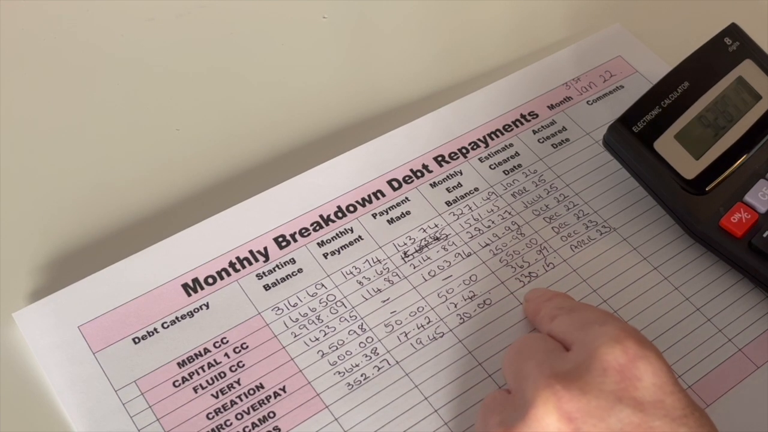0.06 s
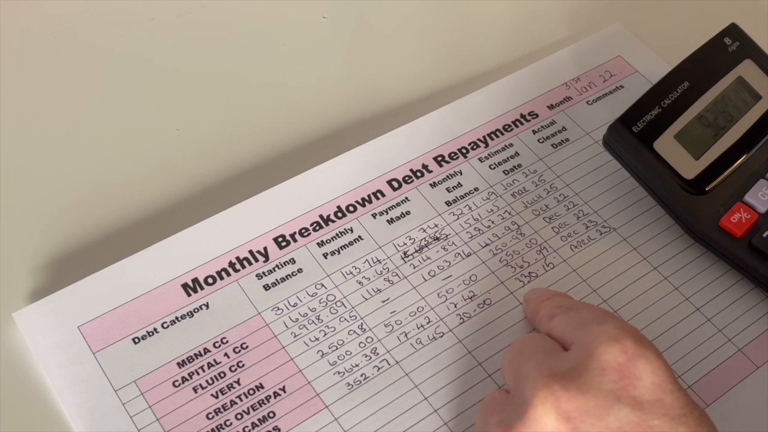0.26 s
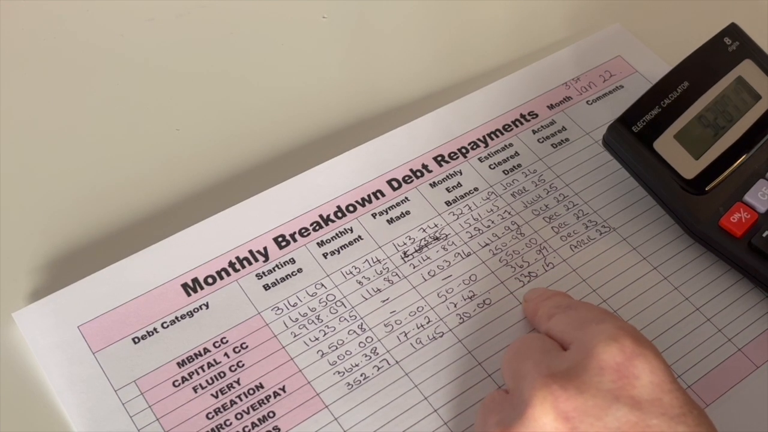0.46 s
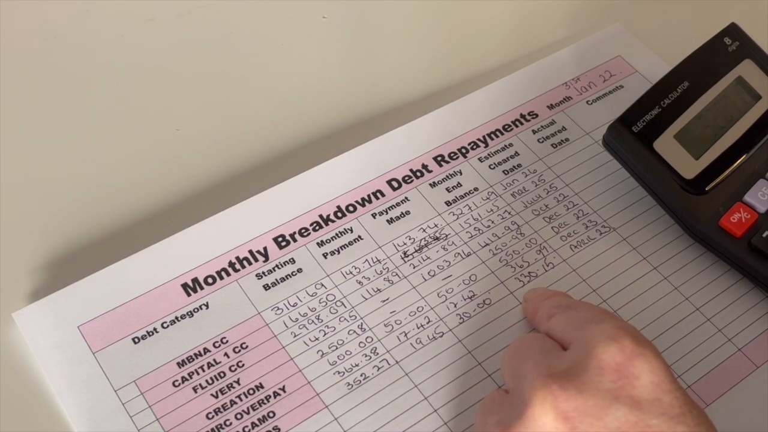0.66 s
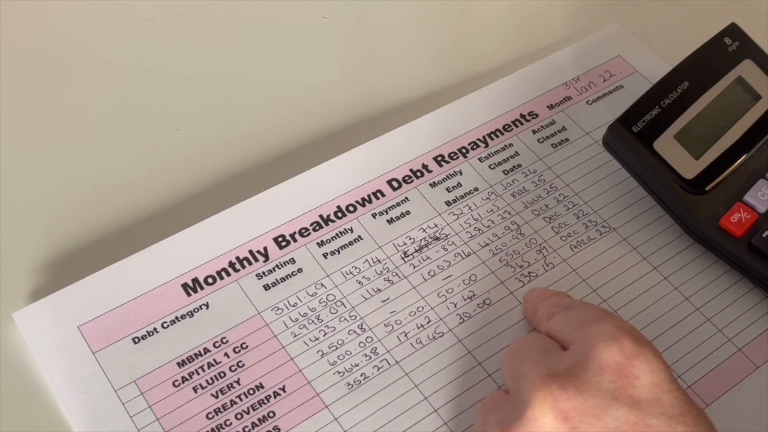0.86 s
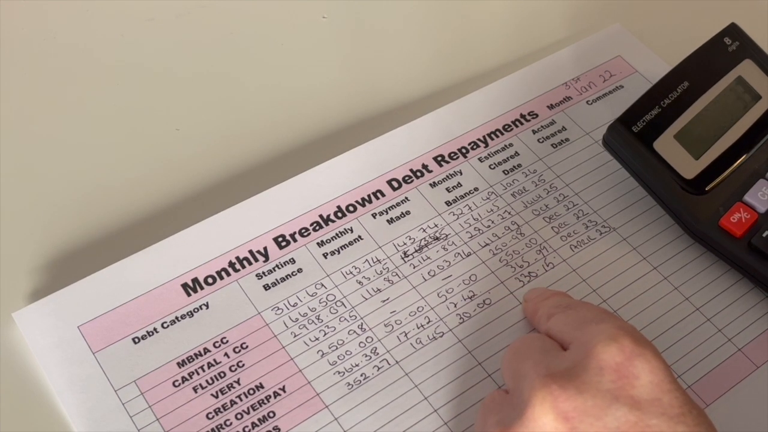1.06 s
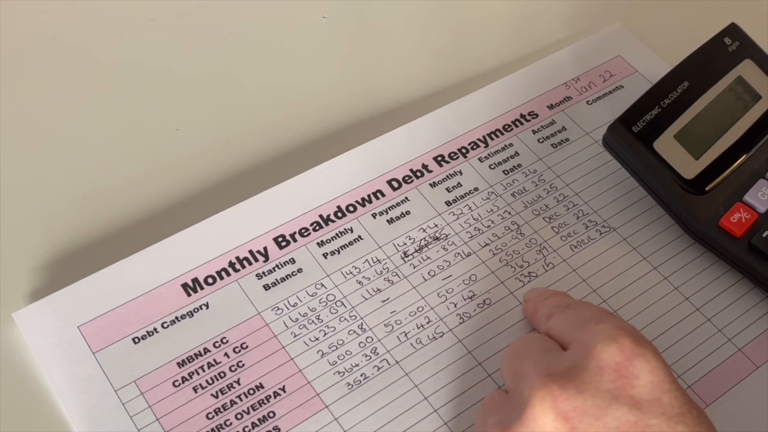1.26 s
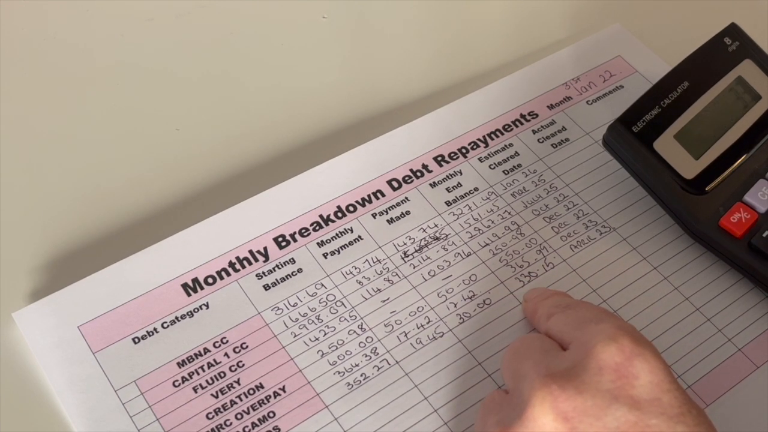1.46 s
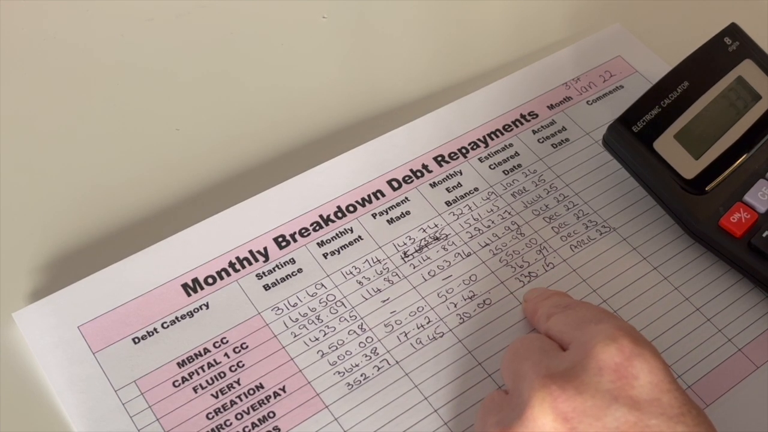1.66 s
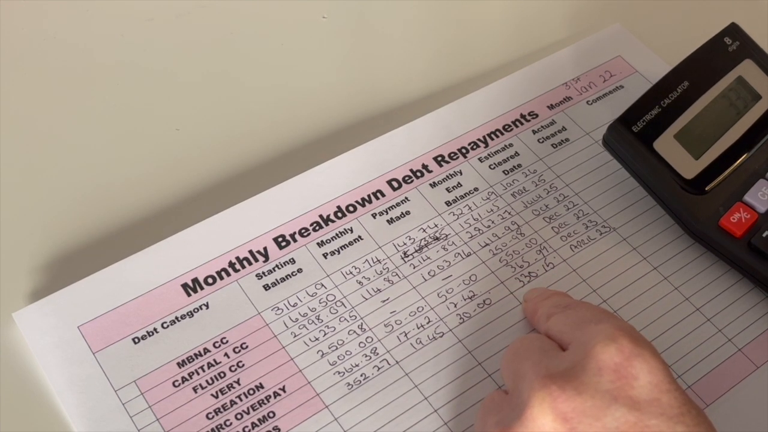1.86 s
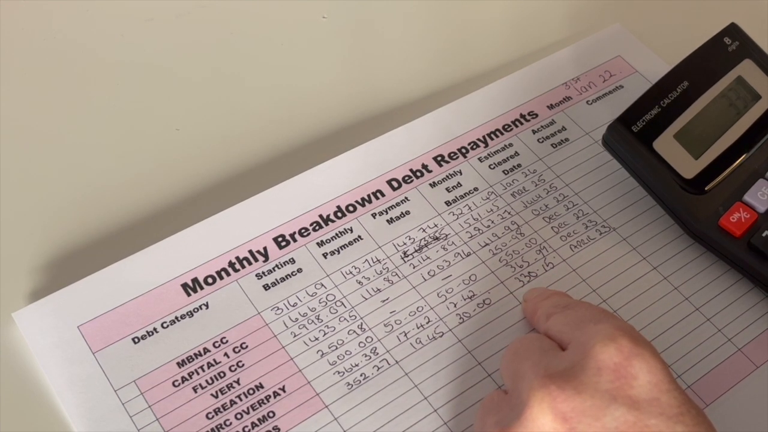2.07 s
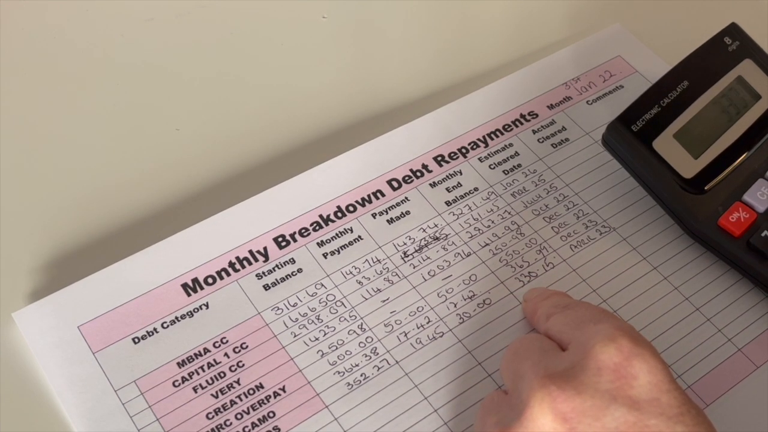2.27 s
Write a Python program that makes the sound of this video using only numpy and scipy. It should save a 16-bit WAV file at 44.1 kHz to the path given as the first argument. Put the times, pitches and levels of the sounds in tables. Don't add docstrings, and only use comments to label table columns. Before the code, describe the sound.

Desk calculator keys pressed one after another, plastic clicks with soft thumps on the desk

```python
import sys
import numpy as np
from scipy import signal
from scipy.fft import rfft, irfft
from scipy.io import wavfile
from scipy.ndimage import uniform_filter1d, map_coordinates

SR = 44100
rng = np.random.default_rng(int(sys.argv[2]) if len(sys.argv) > 2 else 0)


def to_wav(s):
    ch = np.atleast_2d(s).T
    pcm = np.round(np.clip(ch, -1, 1) * 32767)
    wavfile.write(sys.argv[1], SR, pcm.astype(np.int16))


def boost_factor(decibels):
    exponent = np.asarray(decibels, float) / 20
    return 10 ** exponent


N = 101782


def on_log(table, hz):
    table = np.array(table, float)
    return np.interp(np.log(np.maximum(hz, 1)), np.log(table[:, 0]), table[:, 1])


def colour(x, table, extra_db=0):
    hz = np.arange(x.shape[-1] // 2 + 1) * SR / x.shape[-1]
    y = irfft(rfft(x) * boost_factor(on_log(table, hz) + extra_db), x.shape[-1])
    return y / np.sqrt(np.mean(y ** 2))


def decay(t, t60):
    return np.exp(-np.log(1000) * t / t60)


def ring(hz, t60, t):
    return np.sin(2 * np.pi * hz * t) * decay(t, t60)


def add(out, s, x):
    i = int(s * SR)
    out[i:i + len(x)] += x[:len(out) - i]


def walk(rate):
    k = int(SR / rate)
    steps = np.repeat(rng.standard_normal(N // k + 1), k)
    return 1.3 * uniform_filter1d(uniform_filter1d(steps, k), k)[:N]


# (frequency [Hz], level [dB per Hz])
FLOOR_HUE = [(12, -50.5), (20, -42), (36, -3), (59, 1.5), (160, -17), (693, -32), (1420, -42), (5530, -51),
             (15000, -59.5)]


def floor():
    air = colour(rng.standard_normal((2, N)), FLOOR_HUE)
    rumble = signal.sosfilt(signal.butter(2, 600, fs=SR, output="sos"), air)
    fade_db = -6.5 * np.minimum(np.arange(N) / SR - 1.2, 0)
    throb = boost_factor(fade_db + 0.69 * walk(4.16))
    return boost_factor(-60) * (air + rumble * (throb - 1))


# (start [s], full [s], fading [s], end [s], level [dB])
SLIDES = [
    (.0, 0.138, 0.24, .27, -66.5),
    (1.896, 1.96, 2.07, 2.137, -66.5),
]
# (frequency [Hz], level [dB per Hz])
SLIDE_HUE = [(400, -32), (800, -6.5), (1500, -4.5), (2500, -2), (5000, -8), (7500, -14.5), (12000, -15.5),
             (15000, -20)]
# (start [s], full [s], fading [s], end [s], level [dB])
RUBS = [
    (-.1, -.05, 0.015, 0.028, -73.5),
    (.15, .27, 0.38, .45, -73),
]
# (frequency [Hz], level [dB per Hz])
RUB_HUE = [(900, -5.5), (1600, -10), (1750, 1.5), (2150, -2.5), (2500, -13.5), (4000, -20), (6000, -33)]


def slides():
    t = np.arange(N) / SR
    out = np.zeros(N)
    for rows, hue in ((SLIDES, SLIDE_HUE), (RUBS, RUB_HUE)):
        swell = sum(boost_factor(db) * np.interp(t, times, [0, 1, 1, 0]) for *times, db in rows)
        uneven = boost_factor(walk(30))
        out += swell * uneven * colour(rng.standard_normal(N), hue)
    return out


# (time [s], tick level [dB], case ring level [dB], brightness [dB per half octave])
CONTACTS = [(.5484, -54, -58, -2.5), (.5571, -38.5, -49, -1), (.654, -48, -48.5, 0.5), (.6676, -69, -57, 7),
            (.6709, -34, -42, 2), (.6774, -79, -57, -20), (.8273, -48.5, -51.5, -1.5), (.838, -40, -48, 1),
            (0.9366, -67, -48.5, -1.5), (.9525, -29, -40, 2.5), (.9574, -54, -48.5, -5),
            (1.4884, -49, -54.5, 0), (1.4965, -42.5, -46.5, -0.5), (1.5064, -39, -55.5, -0.5),
            (1.6003, -37.5, -54, -11), (1.6059, -32, -43, 2), (1.6115, -31.5, -58, -6),
            (1.6152, -42, -36, 25), (1.7795, -51, -71, -0.5), (1.7865, -46, -57.5, -1.5),
            (1.7933, -45.5, -50.5, -1), (1.9036, -48, -46, 7), (1.9088, -30.5, -67, 0),
            (1.9142, -27, -44.5, 0), (1.9204, -70, -35.5, 13), (2.1147, -49.5, -67, -3),
            (2.1235, -49, -48, 1), (2.1287, -42, -57, 0), (2.2295, -33.5, -56, 0.5),
            (2.2405, -38.5, -52.5, -1)]
# (frequency [Hz], level [dB per Hz])
TICK_HUE = [(500, -45), (1300, 0.5), (2700, -0.5), (4600, 0.5), (6000, -11.5), (9000, -12), (13500, -16.5),
            (15500, -29)]
# (frequency [Hz], level [dB], T60 [s])
CASE = [(325.8, -6, 0.19), (387.2, -5, 0.15), (495.4, -4, 0.17), (640.3, -4.5, 0.072), (806, -5, 0.092),
        (832, -5, .11), (1192, -10, 0.055), (2220, -22, 0.16), (1840, -13.5, 0.13), (2060, -10.5, 0.12),
        (445, -5.5, 0.037), (581.4, -8.5, 0.088), (728, -7.5, 0.088), (980, -13.5, 0.02)]


def tick(noise, tint, bright_db, t):
    rise_ms, fall_ms = 0.92, 3.17
    shape = (1 - np.exp(-t * 1000 / rise_ms)) * np.exp(-t * 1000 / fall_ms)
    hz = np.arange(len(t) // 2 + 1) * SR / len(t)
    scatter_db = 1.5 * np.interp(hz, np.linspace(1000, 14000, num=8), tint)
    tilt_db = bright_db * 2 * np.log2((hz + 500) / 4000)
    return shape * colour(noise, TICK_HUE, scatter_db + tilt_db)


def case_ring(noise, gains, t, span):
    body = 0
    for (hz, db, t60), (gain, detune) in zip(CASE, gains):
        body = body + boost_factor(db + 1.5 * gain) * ring(hz * (1 + 0.013 * detune), t60, t)
    knock_ms = 3.9
    aftershocks = (noise > 1.5) * noise * np.exp(-t[:span] * 1000 / knock_ms)
    knock = aftershocks + (t[:span] == 0) * 6
    return signal.fftconvolve(body, knock / np.sqrt(np.sum(knock ** 2)))


def keys():
    ticks, case = np.zeros(N), np.zeros(N)
    t, span = np.arange(SR // 4) / SR, 2048
    for s, tick_db, case_db, bright_db in CONTACTS:
        noise = rng.standard_normal((2, span))
        tint, gains = rng.standard_normal(8), rng.standard_normal((len(CASE), 2))
        add(ticks, s, boost_factor(tick_db - 2.5) * tick(noise[0], tint, bright_db, t[:span]))
        add(case, s, boost_factor(case_db - 3) * case_ring(noise[1], gains, t, span))
    wobble_ms = 0.35
    moved = np.arange(N) + wobble_ms * SR / 1000 * walk(80)
    return ticks + map_coordinates(case, [moved], order=1)


# (time [s], low mode [dB], second mode [dB], upper modes [dB])
PUSHES = [(.560, -38.5, -28.5, -44.5), (0.658, -42, -76, -40.5), (0.675, -40, -38.5, -64),
          (0.837, -41.5, -25, -36.5), (.938, -54, -56, -41), (.956, -40.5, -38, -40),
          (1.498, -32.5, -59, -38.5), (1.512, -30.5, -51, -51.5), (1.606, -50, -57, -41.5),
          (1.621, -59, -32.5, -35.5), (1.792, -35, -40.5, -36), (1.803, -33.5, -61, -47),
          (1.908, -67, -41.5, -37.5), (1.922, -43, -33.5, -39.5), (2.1261, -55, -26, -45),
          (2.135, -30, -55, -49), (2.237, -57, -67, -42.5)]
# (frequency [Hz], level [dB], T60 [s])
DESK = [(87.1, 1, 0.27), (124.8, 1, 0.17), (226.2, -0.5, 0.14), (251.1, 4.5, 0.098), (280.3, -5, 0.24)]


def desk():
    out, t = np.zeros(N), np.arange(SR // 2) / SR
    push_ms, rise_ms = 2.6, 1.93
    rise = 1 - np.exp(-t * 1000 / rise_ms)
    for s, low_db, second_db, upper_db in PUSHES:
        drift = 1 + 0.0043 * rng.standard_normal(len(DESK))
        levels = (low_db, second_db, upper_db, upper_db, upper_db)
        thump = 0
        for (hz, db, t60), level_db, d in zip(DESK, levels, drift):
            thump = thump + boost_factor(db + level_db) * ring(hz * d, t60, t)
        add(out, s, -rise * thump)
    push = np.hanning(int(push_ms * SR / 1000) + 2)
    return np.convolve(out, push / push.sum())[:N]


# (frequency [Hz], T60 [s])
ROOM_T60 = [(200, 0.35), (1000, 0.27), (4000, 0.17), (12000, 0.18)]


def room(x):
    t = np.arange(SR // 2) / SR
    tails = 0
    for hz in 150 * 2 ** np.arange(0, 7, .5):
        edges = [hz / 2 ** .25, hz * 2 ** .25]
        band = signal.butter(2, edges, "bandpass", fs=SR, output="sos")
        noise = rng.standard_normal((2, len(t)))
        tails = tails + signal.sosfilt(band, noise) * decay(t, on_log(ROOM_T60, hz))
    late_ms = 1.33
    tails = tails * (1 - np.exp(-t * 1000 / late_ms))
    tails = tails / np.sqrt(np.sum(tails ** 2, axis=1, keepdims=True))
    return boost_factor(-12) * signal.fftconvolve(x[None], tails, axes=1)[:, :N]


# (frequency [Hz], shared part [0-1])
ALIKE = [(200, 0.98), (450, 0.66), (1300, 0.03), (2300, 0.93), (5200, 1), (6500, 0.94), (8500, 1),
         (12000, 0.99)]
# (frequency [Hz], lead [radians])
LEAD = [(900, 0), (1400, -0.6), (1750, -1.11), (5400, 0.5), (8500, -3), (11200, -6), (12900, -5.5),
        (14500, -9.5)]
# (frequency [Hz], left minus right [dB])
LEAN = [(300, 0), (600, -3), (1100, 3.5), (1600, -11), (2100, -4), (3200, 0)]


def ports(shared, other):
    hz = np.arange(N // 2 + 1) * SR / N
    alike = np.clip(on_log(ALIKE, hz), 0, 1)
    half = boost_factor(on_log(LEAN, hz) / 2) * np.exp(.5j * on_log(LEAD, hz))
    mid = np.sqrt((1 + alike) / 2) * rfft(shared)
    side = np.sqrt((1 - alike) / 2) * rfft(other)
    return irfft(np.array([(mid + side) * half, (mid - side) / half]), N)


def scene():
    near, low = keys() + slides(), desk()
    direct = near + low
    scatter_ms = 12
    scatter = rng.standard_normal(4096) * np.exp(-np.arange(4096) * 1000 / SR / scatter_ms)
    other = signal.fftconvolve(direct, scatter / np.sqrt(np.sum(scatter ** 2)))[:N]
    around = room(near + boost_factor(-8.5) * low) + floor()
    return ports(direct + around[0], other + around[1])


def low_pass(x):
    return signal.sosfilt(signal.butter(12, 16470, fs=SR, output="sos"), x)


def record(dry):
    low_cut = signal.butter(2, 50, "highpass", fs=SR, output="sos")
    top_cut = signal.butter(8, 15700, fs=SR, output="sos")
    mix = signal.sosfilt(low_cut, signal.sosfilt(top_cut, dry))
    return low_pass(mix)


dry = scene()
out = record(dry)
to_wav(out)
```